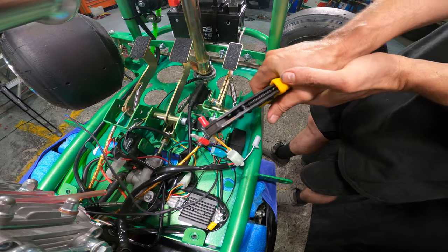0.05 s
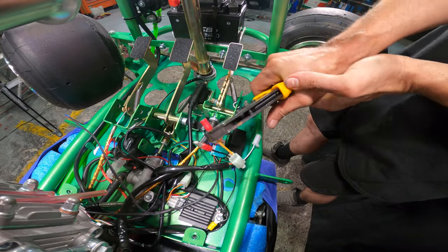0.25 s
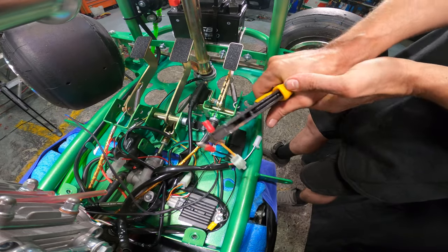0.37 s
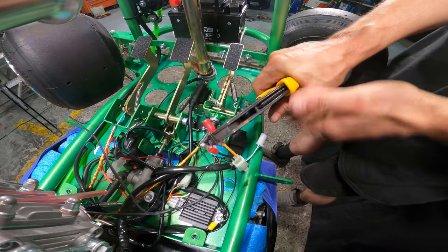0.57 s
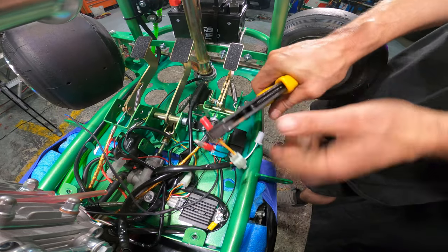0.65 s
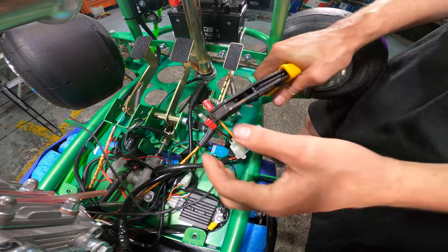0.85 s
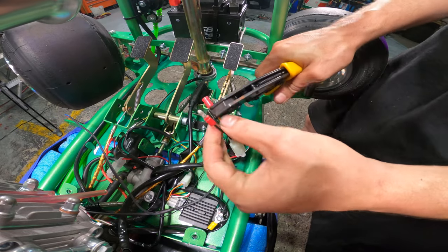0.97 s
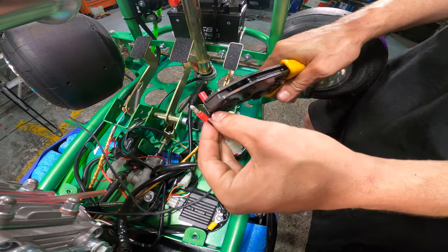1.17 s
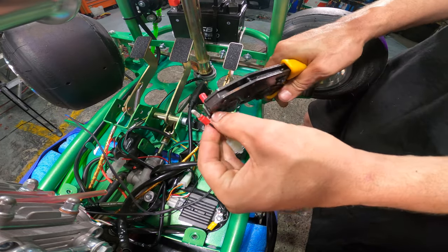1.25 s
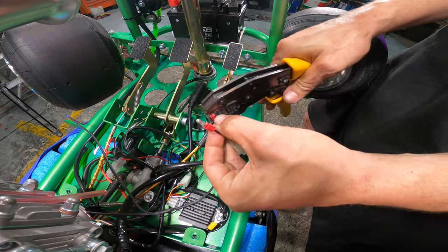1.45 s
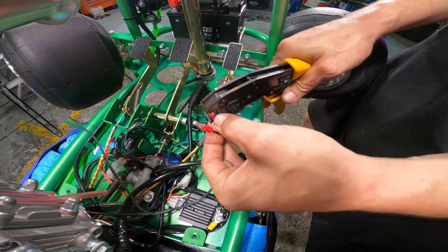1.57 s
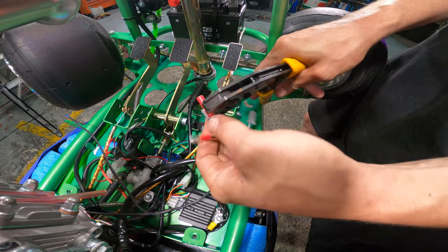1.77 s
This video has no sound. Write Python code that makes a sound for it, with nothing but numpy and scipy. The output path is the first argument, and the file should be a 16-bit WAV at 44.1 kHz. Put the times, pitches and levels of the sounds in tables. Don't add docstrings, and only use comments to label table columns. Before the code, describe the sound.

A steel ratchet crimper close to the microphone gives three clicks while squeezed, a loud release snap with a short metallic ring, a few faint tinks, then a quickening rattle ending on a bouncing stop.

```python
import sys
import numpy as np
from scipy import signal
from scipy.fft import rfft, irfft
from scipy.io import wavfile

SR = 44100
rng = np.random.default_rng(int(sys.argv[2]) if len(sys.argv) > 2 else 0)


def gain_from_db(level_db):
    decades = np.asarray(level_db, float) / 20
    return 10 ** decades


def dump(signal):
    limited = np.clip(np.atleast_2d(signal).T, -1, 1)
    pcm = np.round(limited * 32767).astype(np.int16)
    wavfile.write(sys.argv[1], SR, pcm)


N = 79380

CLOSING_S = (.0043, .1005, .1960)
SNAP_S = (.2385,)
STOP_S = (1.3928, 1.3980)


def evened(x):
    return x / np.sqrt(np.mean(x ** 2) + 1e-20)


def read(points, hz):
    point_hz, value = np.transpose(points)
    return np.interp(np.log(hz + 1), np.log(point_hz + 1), value)


def add(mix, start_s, sound):
    part = mix[max(round(start_s * SR), 0):][:len(sound)]
    part += sound[:len(part)]


def ring(mode_hz, modes, seconds, tilt_db_oct=0., best_hz=1000., lift_db=0., crack=0):
    favour_oct, crack_db, crack_t60_s = .12, 4, .007
    t = np.arange(0, seconds, 1 / SR)
    hz = np.array(mode_hz)[:, None]
    db, t60_s = np.transpose(modes)[:, :, None]
    db = db + tilt_db_oct * np.log2(hz / 4000)
    db = db + lift_db * np.exp(-(np.log2(hz / best_hz) / favour_oct) ** 2)
    envelope = gain_from_db(db - 60 * t / t60_s)
    envelope = envelope + crack * gain_from_db(db + crack_db - 60 * t / crack_t60_s)
    return (envelope * np.sin(2 * np.pi * hz * t)).sum(0)


def clicks(times_s, events, mode_hz, modes, scatter_db, scatter_t60_s, crack=1):
    # (frequency [Hz], level [dB])
    scatter = [(400, -14), (1000, -11), (1600, -2.5), (4000, -.5), (8000, -4.5), (11000, -9),
               (15500, -20.5)]
    rise_s, reflection_s, reflection_db = .00015, .00075, -2
    size = 8192
    out = np.zeros((2, N))
    t = np.arange(size) / SR
    hz = np.fft.rfftfreq(size, 1 / SR)
    late = round(reflection_s * SR)
    for start_s, (db, tilt_db_oct, best_hz, lift_db) in zip(times_s, events):
        body = -ring(mode_hz, modes, size / SR, tilt_db_oct, best_hz, lift_db, crack)[:size]
        body = body * (1 - np.exp(-t / rise_s))
        body = body + gain_from_db(reflection_db) * np.r_[np.zeros(late), body[:size - late]]
        colour_db = read(scatter, hz) + tilt_db_oct * np.log2(hz / 4000 + .05)
        loose = evened(irfft(rfft(rng.standard_normal(size)) * gain_from_db(colour_db)))
        loose = loose * np.minimum(t / .001, 1) * gain_from_db(scatter_db - 60 * t / scatter_t60_s)
        add(out[0], start_s, gain_from_db(db) * (body / np.abs(body).max() + loose))
        add(out[1], start_s, 2 * gain_from_db(db) * np.ones(1))
    return out


def floor():
    # (frequency [Hz], level [dB])
    hiss = [(12, -36), (20, -12), (101, -4.5), (365, -17.5), (419, -19.5), (510, -20.5), (843, -20.5),
            (1650, -25), (15800, -30.5)]
    # (frequency [Hz], width [Hz], rms [dB])
    hum = [(49, 19, -78.5), (98, 2.7, -76), (115, 11, -81), (146, 16, -74.5), (1764, 9, -87),
           (5700, 4.4, -90.5)]
    hiss_db = -64.5
    hz = np.fft.rfftfreq(N, 1 / SR)
    z = rfft(rng.standard_normal((len(hum) + 1, N)))
    out = gain_from_db(hiss_db) * evened(irfft(z[0] * gain_from_db(read(hiss, hz)), N))
    for (band_hz, width_hz, db), row in zip(hum, z[1:]):
        band = irfft(row / (1 + ((hz - band_hz) / width_hz) ** 2), N)
        out = out + gain_from_db(db) * evened(band)
    return out


def room(x):
    # (frequency [Hz], t60 [s])
    decay = [(500, 1), (1500, 0.61), (4000, 0.72), (8000, 0.64), (14000, 0.22)]
    # (frequency [Hz], level [dB])
    tone = [(300, -36), (1000, -6), (2300, -1.5), (4200, -3), (5500, -3), (8500, -3.5), (11000, -3),
            (15000, -18.5)]
    taps = np.zeros(SR)
    at = np.arange(200, SR - 10, 10)
    taps[at + rng.integers(0, 10, len(at))] = rng.choice([-1., 1.], len(at))
    hz, t, z = signal.stft(taps, SR, nperseg=256)
    tail_db = read(tone, hz)[:, None] - 60 * t / read(decay, hz)[:, None]
    tail = signal.istft(z * gain_from_db(tail_db), SR, nperseg=256)[1]
    return signal.fftconvolve(x, tail / np.linalg.norm(tail))[:N]


def handles():
    handle_hz = 1385, 1402, 1660, 2135, 2165, 2490, 2700, 4043, 6584, 8888
    handle_modes = [(-49, 0.18), (-59, 0.7), (-59, 0.19), (-58.5, 0.53), (-56, .3), (-61, 0.46),
                    (-73, 0.295), (-61, .25), (-65, .35), (-54, 0.45)]
    beat_hz = 1067.6, 1072.4, 1070.5
    beat_modes = [(-54, .55), (-54.5, .55), (-70, 1.2)]
    after_hz = 1075, 1856, 3290, 3500, 5682, 5694
    after_modes = [(-71, 0.61), (-77, 0.42), (-63, 0.25), (-71, 0.38), (-74, .3), (-66, 0.54)]
    swell_s, first_ring_db = .018, -15.5
    thud_s, thud_db, thud_width_s, thud_low_hz = .2492, -33.5, .00042, 122
    out = np.zeros(N)
    steel = ring(np.r_[handle_hz, beat_hz], np.concatenate([handle_modes, beat_modes]), 1)
    steel = steel * np.minimum(np.arange(len(steel)) / (swell_s * SR), 1)
    add(out, SNAP_S[0], steel)
    add(out, CLOSING_S[0], gain_from_db(first_ring_db) * steel)
    add(out, STOP_S[0], ring(after_hz, after_modes, 1))
    u = np.arange(0, 40, 1 / (SR * thud_width_s)) - 3
    thud = signal.lfilter(*signal.butter(2, thud_low_hz, "high", fs=SR), np.exp(-u ** 2))
    add(out, thud_s - 3 * thud_width_s, gain_from_db(thud_db) * thud)
    return out


def tinks():
    times_s = .5425, .7257, 1.1362, 1.1788
    # (peak [dB], tilt [dB/octave], favoured mode [Hz], lift [dB])
    events = [
        (-59.5, -1, 6100, 4),
        (-48, -1, 4380, 3.6),
        (-48, -0.093, 7050, 5.7),
        (-56, -0.27, 1970, 12),
    ]
    mode_hz = 1800, 2750, 2900, 3150, 4380, 5200, 6100, 7050, 7700, 8600, 10800
    modes = [(-3, .045), (-6, .04), (-13, .06), (2, .065), (-2, .075), (-13, .035), (-9, .04), (-11, .11),
             (-20, .3), (-17, .1), (-14, .02)]
    return clicks(times_s, events, mode_hz, modes, scatter_db=-8, scatter_t60_s=.04, crack=0)


def stopping():
    # (peak [dB], tilt [dB/octave], favoured mode [Hz], lift [dB])
    events = [
        (-27.5, -0.91, 2010, 4.6),
        (-37.5, -.5, 3630, 11),
    ]
    mode_hz = 600, 1622, 1866, 2069, 3350, 3521, 4183, 5280, 6450, 7484, 8356, 10200, 12200, 14500
    modes = [(-5.5, 0.023), (-49, 0.047), (0.5, 0.049), (-4, 0.069), (1, 0.021), (6.5, .03), (-5, 0.0087),
             (-28, 0.027), (-1, 0.02), (7.5, 0.026), (-2, .015), (3, .01), (-3, 0.009), (-11, .007)]
    return clicks(STOP_S, events, mode_hz, modes, scatter_db=-11, scatter_t60_s=.035)


def opening():
    times_s = 1.2415, 1.2678, 1.2715, 1.3143, 1.3541, 1.3671, 1.3760, 1.3840
    # (peak [dB], tilt [dB/octave], favoured mode [Hz], lift [dB])
    events = [
        (-39, -1.4, 2900, 6),
        (-51, -0.25, 6400, 3),
        (-40, -1.4, 1700, 1.6),
        (-44.5, -2.6, 3700, 3),
        (-42, -1.9, 3700, 6.2),
        (-40, -1.1, 1700, 5),
        (-40.5, 1, 1750, 9.2),
        (-39, .1, 1750, 5.9),
    ]
    mode_hz = 650, 1712, 2250, 2880, 3700, 4900, 5650, 7200, 8470, 9500, 12200, 14500
    modes = [(-3, 0.019), (-4.5, 0.023), (-15, 0.0071), (-7.5, 0.012), (-4, 0.024), (-12, 0.018),
             (-9, 0.025), (-2, 0.01), (1.5, 0.017), (-3.5, 0.012), (-23, .012), (-14, .01)]
    echo_s, echo_hz, echo_db = .0055, 3400, -11.5
    open_room_db = 2.5
    out = clicks(times_s, events, mode_hz, modes, scatter_db=-6.5, scatter_t60_s=.026) + stopping()
    echo = signal.lfilter(*signal.iirpeak(echo_hz, 4, SR), out[0])
    add(out[0], echo_s, gain_from_db(echo_db) * echo[:N - SR // 20])
    out[1] *= gain_from_db(open_room_db)
    return out


def closing():
    # (peak [dB], tilt [dB/octave], favoured mode [Hz], lift [dB])
    events = [
        (-26.5, -0.5, 4200, 29.5),
        (-35.5, -2, 1650, -3.5),
        (-30.5, 1.4, 2690, 8.5),
    ]
    mode_hz = 1380, 1653, 2690, 3420, 4020, 5000, 5760, 6680, 7600, 8900, 10600, 13200
    modes = [(-11.5, 0.026), (-0.5, .015), (-0.5, 0.012), (-7, 0.023), (-16, 0.025), (-2.5, 0.016),
             (-22, 0.027), (-3.5, .014), (-0.5, 0.02), (-3.5, 0.011), (-23, .013), (-17.5, 0.011)]
    return clicks(CLOSING_S, events, mode_hz, modes, scatter_db=-9.5, scatter_t60_s=.024)


def snap():
    # (peak [dB], tilt [dB/octave], favoured mode [Hz], lift [dB])
    events = [
        (-9, .1, 5000, 0.5),
    ]
    mode_hz = 1390, 1655, 2520, 3200, 4080, 7900, 5545, 6560, 7450, 8010, 8500, 9650, 11300, 13000
    modes = [(-35, .03), (-6.5, 0.0211), (-10.5, 0.029), (-11, 0.026), (-9, 0.026), (5, 0.00547),
             (-18.5, 0.008), (-6.5, 0.016), (5.5, 0.019), (-8.5, .022), (-1.5, 0.022), (-3, 0.024),
             (-6, .018), (-19, 0.028)]
    return clicks(SNAP_S, events, mode_hz, modes, scatter_db=-12.5, scatter_t60_s=.033)


def scene():
    small_hz, room_db, ring_room_db = 500, -13.5, -33
    tool, blows = tinks() + opening() + closing() + snap()
    tool = signal.sosfilt(signal.butter(2, small_hz, "high", fs=SR, output="sos"), tool)
    reverb = room(gain_from_db(room_db) * blows + gain_from_db(ring_room_db) * tool)
    return (floor() + reverb + handles() + tool)[None]


def band_limit(x):
    return signal.sosfilt(signal.butter(12, 16510, fs=SR, output="sos"), x)


def record(dry):
    edge_hz = 15800
    low_pass = signal.firwin(511, edge_hz, window=("kaiser", 1.5), fs=SR)
    mix = signal.oaconvolve(dry, low_pass[None], "same")
    return band_limit(mix)


dry = scene()
out = record(dry)
dump(out)
```